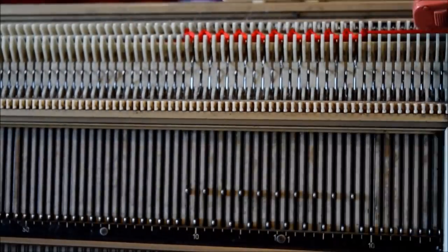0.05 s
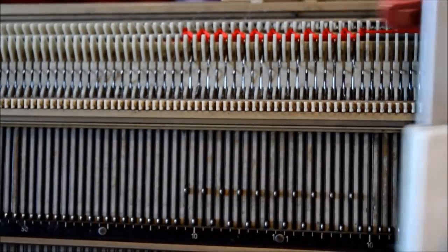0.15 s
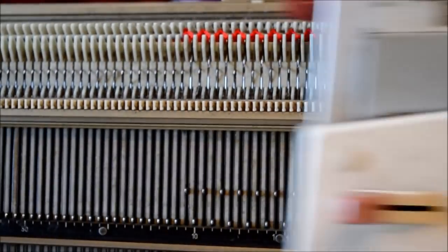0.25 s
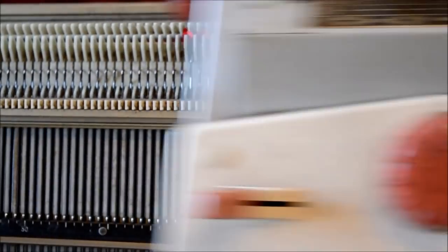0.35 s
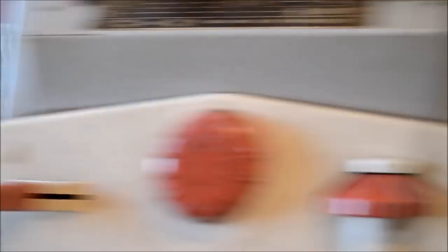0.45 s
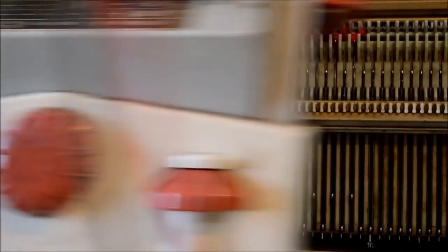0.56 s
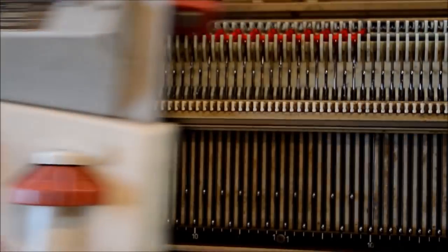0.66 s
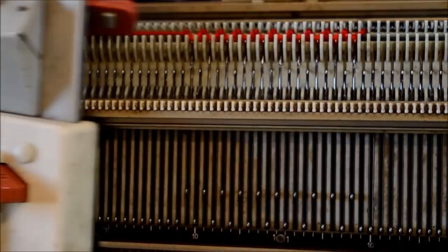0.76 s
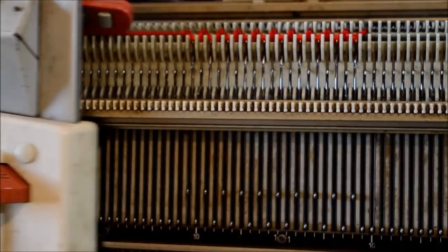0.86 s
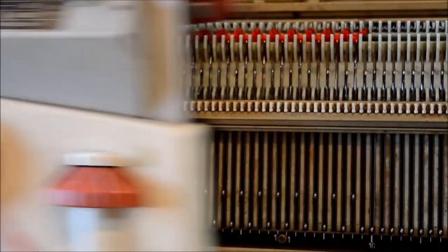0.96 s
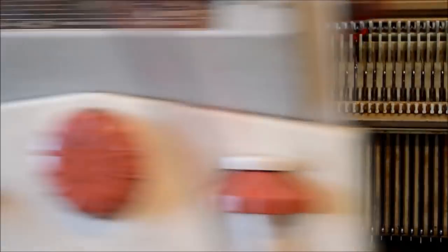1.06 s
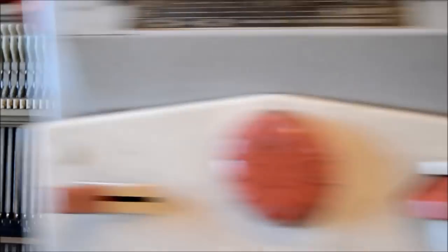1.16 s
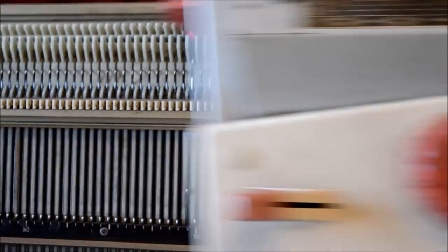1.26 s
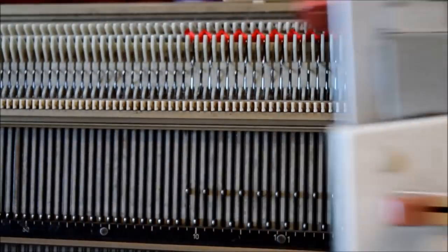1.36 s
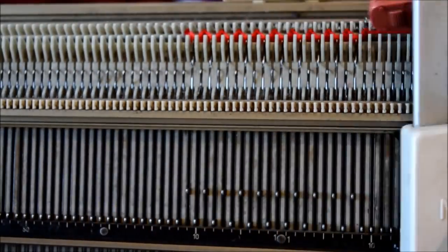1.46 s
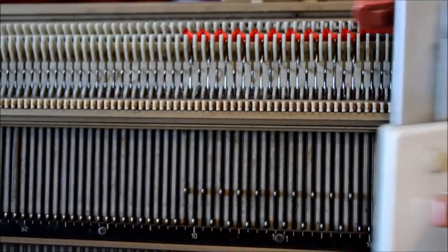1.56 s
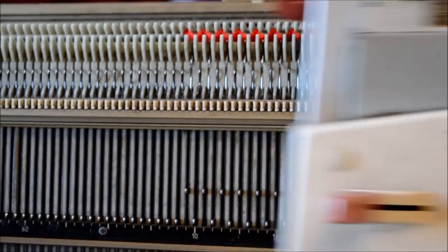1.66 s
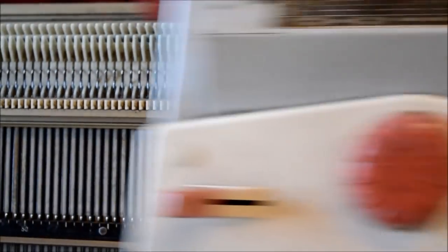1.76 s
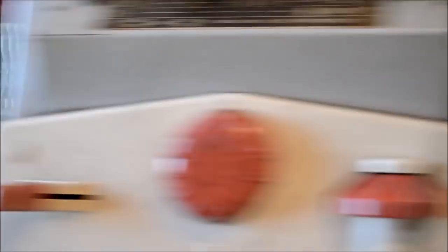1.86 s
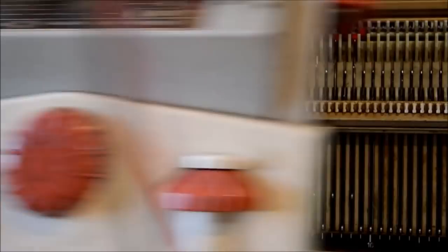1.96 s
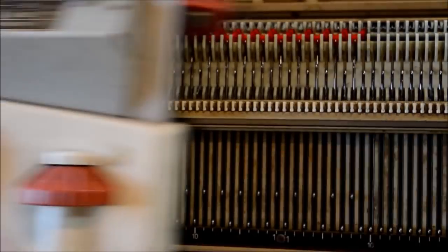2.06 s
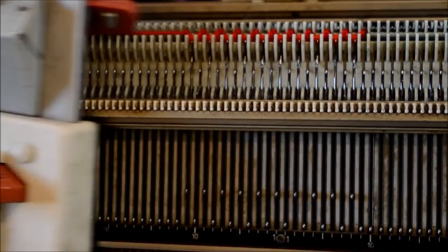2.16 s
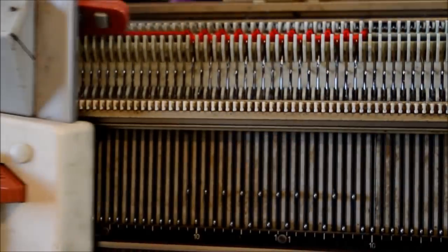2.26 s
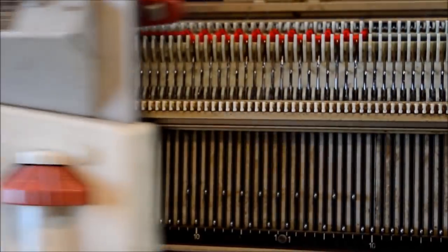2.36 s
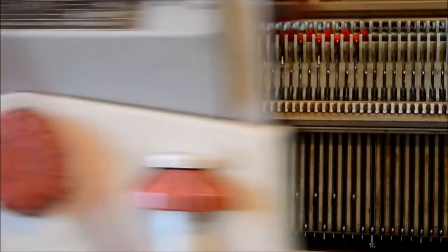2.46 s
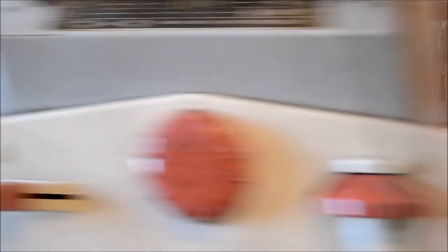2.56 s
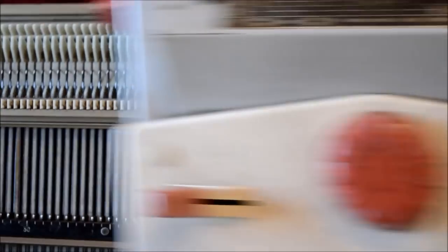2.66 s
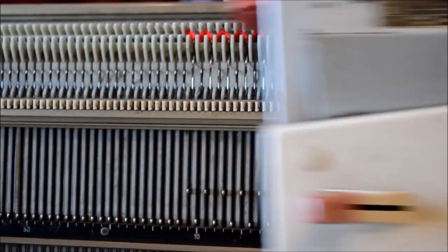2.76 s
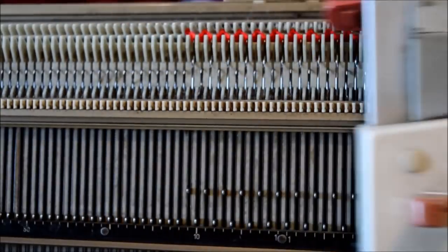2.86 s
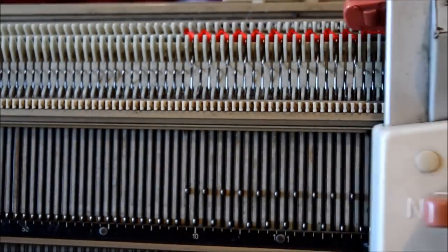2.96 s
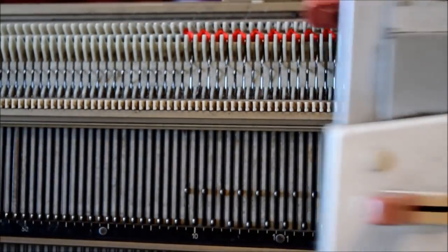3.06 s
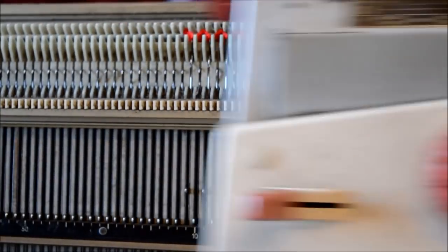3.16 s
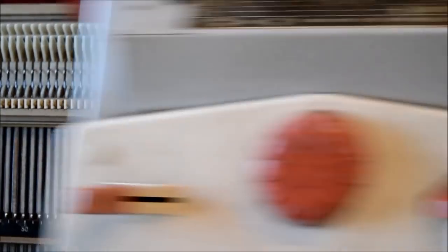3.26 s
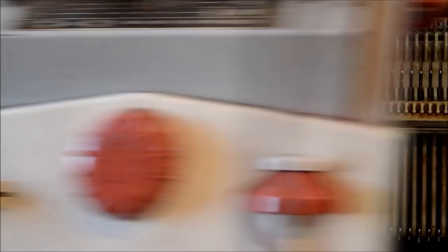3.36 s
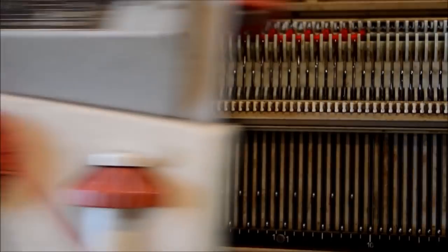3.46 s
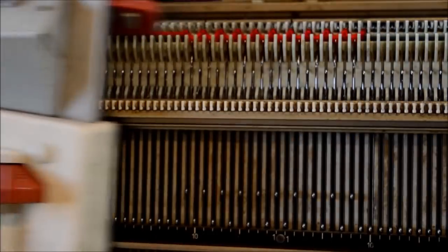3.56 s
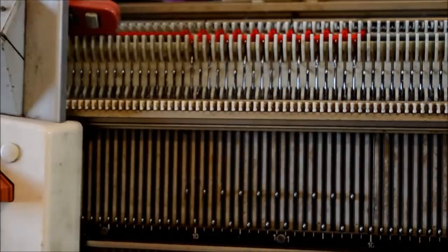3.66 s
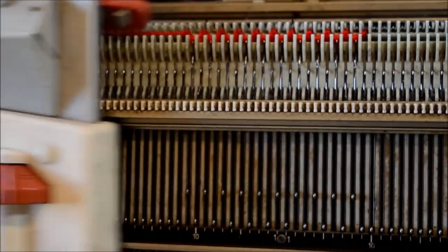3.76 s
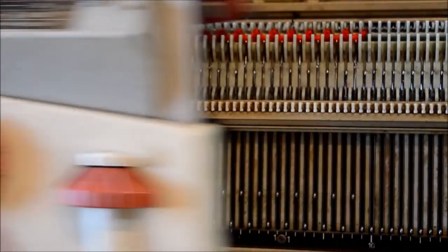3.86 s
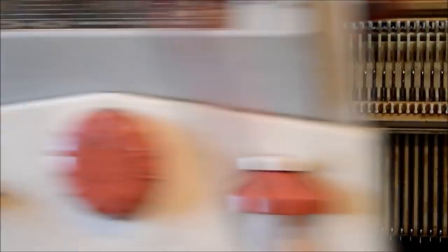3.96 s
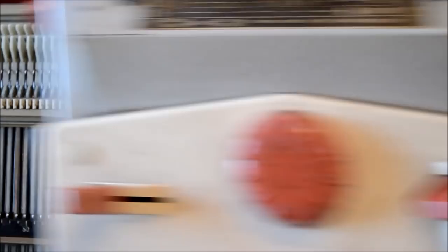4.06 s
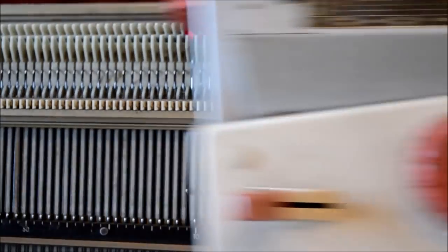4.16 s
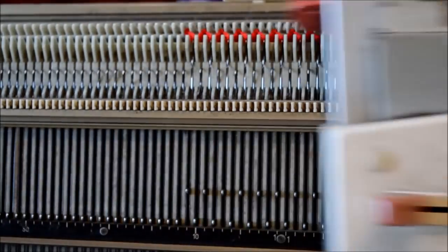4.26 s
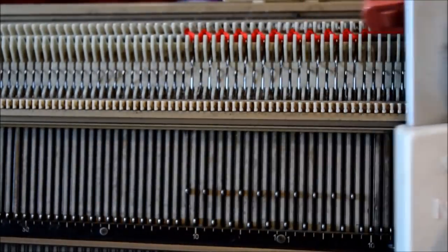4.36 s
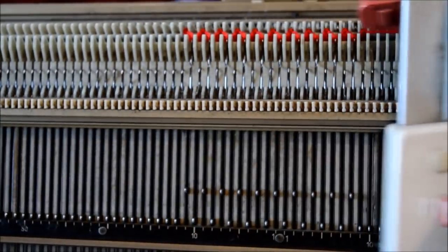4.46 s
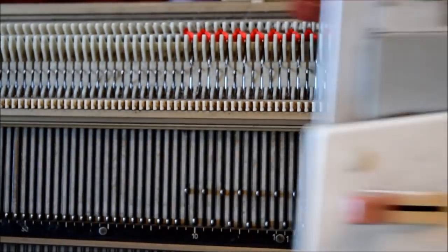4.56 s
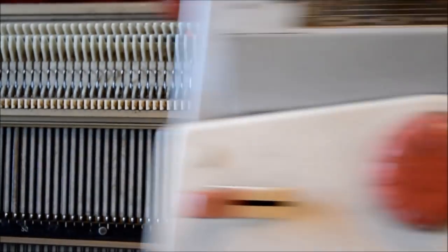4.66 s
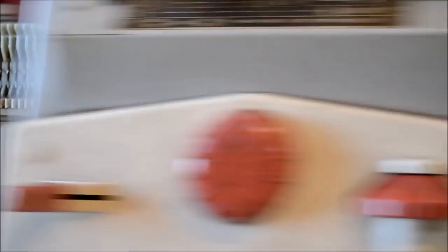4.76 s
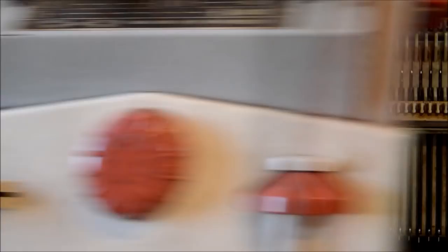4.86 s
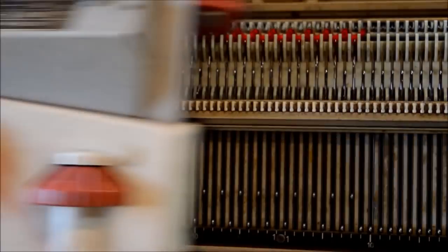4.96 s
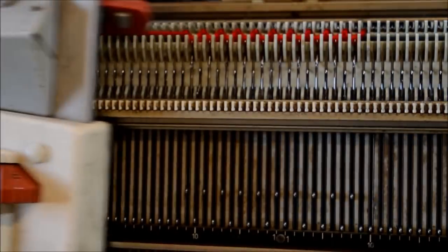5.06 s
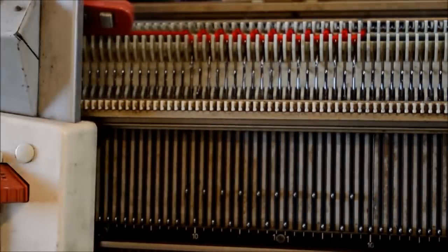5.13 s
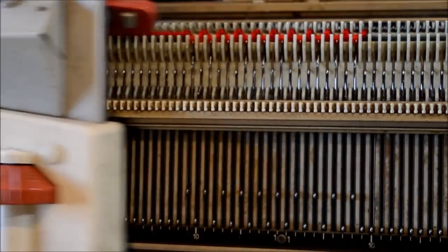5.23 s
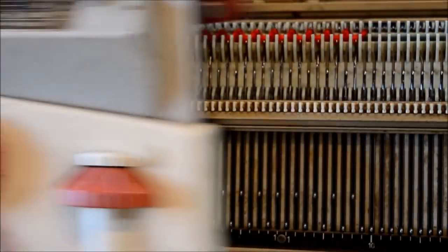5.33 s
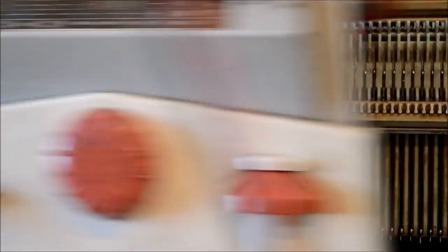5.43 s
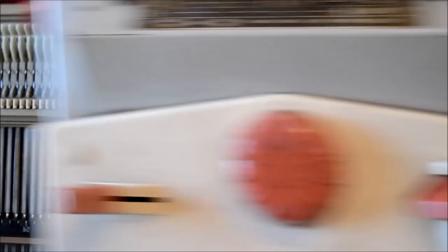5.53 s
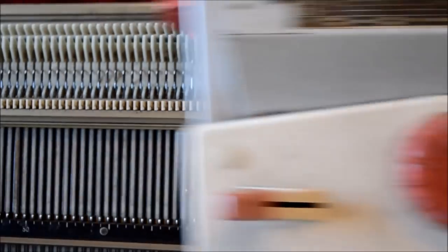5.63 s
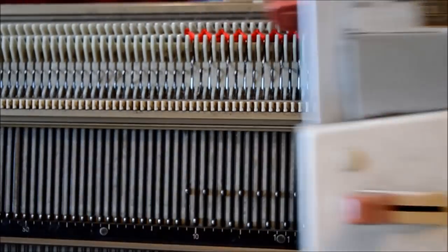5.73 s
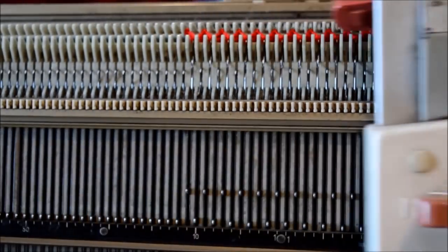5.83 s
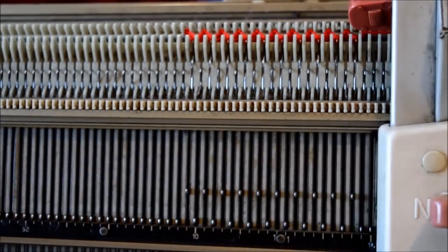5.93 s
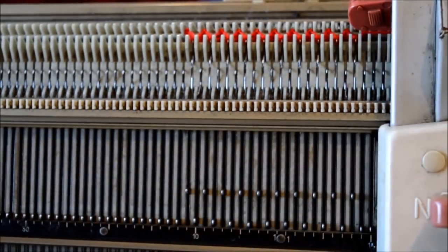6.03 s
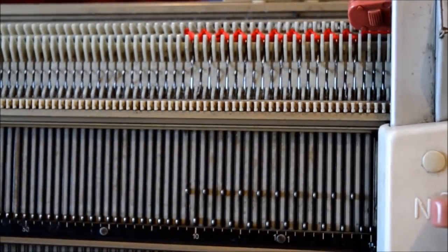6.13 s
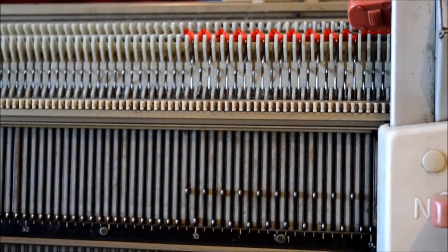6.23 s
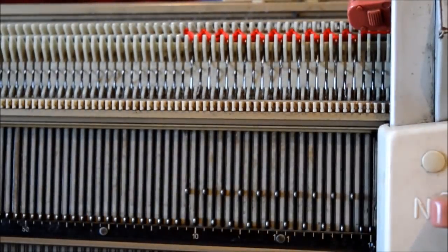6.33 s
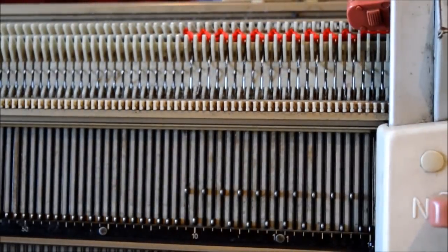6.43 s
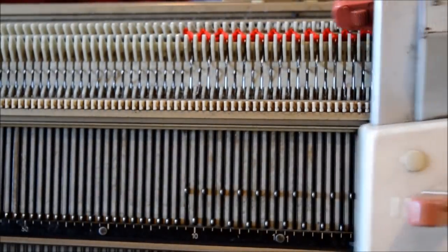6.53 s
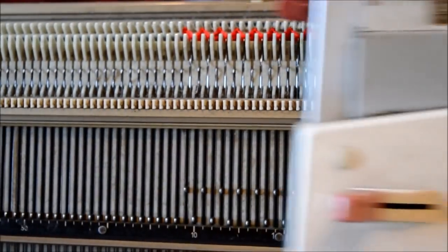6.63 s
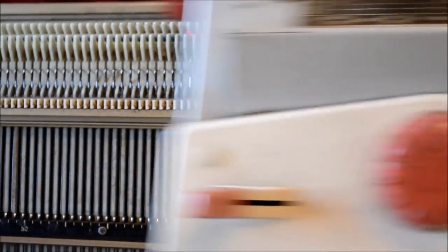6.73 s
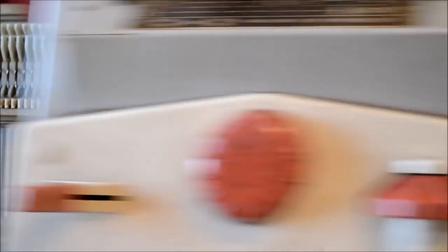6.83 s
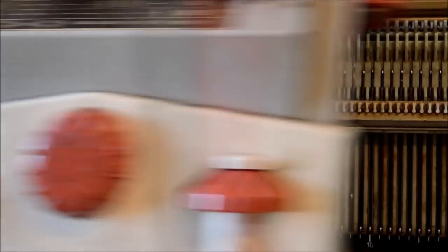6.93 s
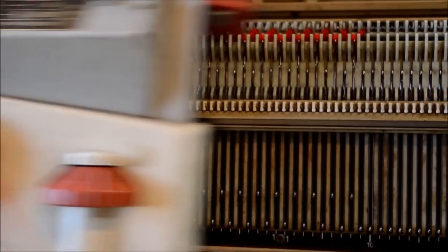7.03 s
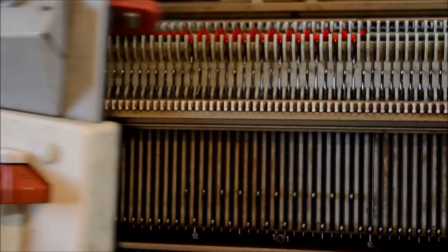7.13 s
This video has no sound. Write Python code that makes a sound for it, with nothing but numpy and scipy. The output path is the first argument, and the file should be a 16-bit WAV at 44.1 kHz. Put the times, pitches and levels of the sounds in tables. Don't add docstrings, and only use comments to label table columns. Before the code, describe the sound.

A knitting machine carriage is shoved back and forth over metal needle beds, sharp steel clacks at each turn followed by rattling, ticking swishes indoors.

```python
import sys
import numpy as np
from scipy import signal
from scipy.fft import rfft, irfft
from scipy.io import wavfile
from scipy.ndimage import uniform_filter1d

SR = 44100
rng = np.random.default_rng(int(sys.argv[2]) if len(sys.argv) > 2 else 0)


def to_wav(s):
    ch = np.atleast_2d(s).T
    pcm = np.round(np.clip(ch, -1, 1) * 32767)
    wavfile.write(sys.argv[1], SR, pcm.astype(np.int16))


def ratio_of_db(decibels):
    return 10 ** (np.asarray(decibels, float) / 20)


N = 317079
LEAD = SR // 2
M = N + LEAD
TIME = (np.arange(M) - LEAD) / SR

# turn_s (main clack), cam_slowness, last_snap_s, strength_db, snap_ring_hz
LEFTWARD = [
    (.2431, 1.08, 0.63, 0, 5080),
    (1.6856, 1.12, 2.068, -0.5, 5100),
    (3.1513, 1.1, 3.51, 0.5, 5270),
    (4.6047, 1, 4.97, 0, 4900),
    (6.6707, 1.1, 7.0348, 1.5, 4700),
]
RIGHTWARD = [
    (-.41, 1., -.09, 0.4, 4200),
    (.9721, 1.02, 1.364, -0.081, 4300),
    (2.409, 1, 2.8203, 0.36, 4060),
    (3.8501, 1.14, 4.2674, -0.19, 4900),
    (5.3228, 1.16, 5.745, 0, 4180),
]


def unit(x):
    return x / np.sqrt(np.mean(x ** 2))


def colour(x, table):
    hz, db = np.transpose(table)
    f = np.fft.rfftfreq(len(x), 1 / SR) + 1
    gain_db = np.interp(np.log(f), np.log(hz), db)
    return irfft(rfft(x) * ratio_of_db(gain_db), len(x))


def band(x, lo_hz, hi_hz):
    sos = signal.butter(3, [lo_hz, min(hi_hz, 0.45 * SR)], "bandpass", fs=SR, output="sos")
    return signal.sosfilt(sos, x)


def ring(x, modes):
    out = 0
    for k, (hz, width_hz, db) in enumerate(modes):
        b, a = signal.iirpeak(hz, hz / width_hz, SR)
        out = out + (-1) ** k * ratio_of_db(db) * signal.lfilter(b, a, x)
    return out


def walk(rate_hz):
    k = int(SR / rate_hz)
    held = np.repeat(rng.standard_normal(M // k + 1), k)
    return 3.5 * uniform_filter1d(held, k)[:M]


def track(rows):
    s, *columns = np.transpose(rows)
    return [np.interp(TIME, s, c) for c in columns]


def chatter(rate_hz, jitter, scatter_db, rise_ms, fall_ms):
    chance = rng.random((int(M / SR * 1500), 2))
    gaps = 1 + jitter * (2 * chance[:, 0] - 1)
    at = (np.cumsum(gaps) * SR / rate_hz).astype(int)
    blows = np.zeros(M)
    blows[at[at < M]] = ratio_of_db(-scatter_db * np.log(chance[at < M, 1] + 1 / 8))
    t_ms = np.arange(SR // 20) / SR * 1000
    shape = (1 - np.exp(-t_ms / rise_ms)) * np.exp(-t_ms / fall_ms)
    return unit(signal.fftconvolve(blows, shape)[:M])


def swell(ms, rise, hold, fall, ring_on=0.36, ring_ms=8.0):
    t = np.arange(SR // 20) / SR * 1000 / ms
    after = np.maximum(t - hold, 0)
    bite = 1 - np.exp(-(t / rise) ** 2)
    return bite * ((1 - ring_on) * np.exp(-after / fall) + ring_on * np.exp(-after * ms / ring_ms))


def burst(shape, noise):
    shaped = shape * noise
    return shaped * np.sqrt(np.sum(shape ** 2) / np.sum(shaped ** 2))


def cam_flips():
    # early_ms, top_db, plate_minus_top_db, shell_minus_top_db, length_ms
    cams_left = [
        (36, -23, -2.5, -8.5, 5),
        (31.4, -18, -1, -13, 7),
        (14.06, -13.5, 1, -11, 4),
        (7.1, -7, -5.5, -15, 4.2),
        (0, 1.1, 0.6, -5.5, 5.3),
    ]
    cams_right = [
        (75, -26, -15, -7, 3.3),
        (62, -20, -4, -3.5, 8),
        (54, -13, -2, -9, 5),
        (47.4, -15, 2, -8.5, 5.4),
        (35.8, -12, 2, -7, 4),
        (26.9, -6, -0.5, -14.5, 3.4),
        (17.3, -7, -1, -14.5, 6),
        (10, -9, 1, -11, 5),
        (0, 0, -1.5, -10, 9),
    ]
    # start_s, top_db, plate_minus_top_db, length_ms
    slack = [(.1756, -21.5, -10, 4.5), (.1865, -32.5, 0, 9), (.8724, -34, -10, 2.7), (1.5959, -30, -5, 6),
             (1.62, -30, -8, 4), (1.6287, -30, -1, 5), (1.674, -14, -4, 4), (2.308, -34, -5, 4.3),
             (3.061, -28, -4.5, 6.6), (3.081, -32, -8, 5), (3.093, -36, -14, 4), (4.5219, -35.5, -1, 7.8),
             (4.5426, -23, -13.5, 4.8), (4.5517, -23.5, -5.5, 8.4), (5.2845, -16, 3, 2.2),
             (6.5874, -28, -9, 5), (6.602, -32, -4, 3.5), (6.6451, -21.5, -5.5, 9)]
    flips = []
    for passes, cams in [(LEFTWARD, cams_left), (RIGHTWARD, cams_right)]:
        for turn_s, slowness, *_ in passes:
            for early_ms, *levels in cams:
                flips.append((turn_s - slowness * early_ms / 1000, *levels))
    for start_s, top_db, plate_db, ms in slack:
        flips.append((start_s, top_db, plate_db, -8, ms))
    return flips


def snaps():
    # start_s, top_db, ring_hz, ring_minus_top_db
    loose_parts = [(0.345, -13.5, 10800, -5), (0.3805, -12, 7680, 7.5), (0.43, -13, 9520, -9),
                   (1.057, -17, 9540, 1), (1.0912, -15, 9800, -8), (1.123, -13, 11600, 4),
                   (1.8003, -15, 7730, 7.5), (1.851, -12, 9500, -7), (2.4996, -12, 9660, 7),
                   (2.5342, -12, 8760, -8.5), (2.5577, -12, 11800, 5), (2.5672, -18.5, 7900, -7),
                   (3.25, -13, 7860, 7), (3.304, -8, 4830, 6), (3.678, -36, 13000, 3),
                   (3.934, -22, 10000, -7), (3.947, -11, 11100, 3), (3.9593, -15, 11000, 5.5),
                   (3.982, -12.5, 11760, 2), (4.0042, -13, 11600, 10), (4.7139, -13.5, 7820, 7),
                   (4.7642, -15, 7880, -5.5), (4.848, -13, 10340, -2), (4.9056, -19, 9400, -5),
                   (5.4094, -17.5, 9500, 2), (5.4212, -15, 10940, 5), (5.444, -16, 11840, 11),
                   (5.477, -12, 7800, -3.5), (6.7765, -13, 7840, 8.5)]
    # start_s, top_db, ring_hz, ring_minus_top_db, length_ms
    first_stirs = [
        (.158, -34.5, 6500, -1, 4),
        (6.4546, -50, 1920, 28, 5),
        (6.4546, -50, 5000, 14, 3),
        (6.466, -58, 680, 28, 8),
        (6.557, -42, 6500, 2, 8),
    ]
    # late_ms, top_db, ring_hz (0: the pass's own), ring_minus_top_db, length_ms
    snaps_left = [
        (-36, -17, 9300, 0, 4.4),
        (0, -13, 0, 3, 5),
        (8, -19, 10000, -2, 2.8),
    ]
    snaps_right = [
        (0, -14, 0, 7, 2.4),
        (0, -16, 8500, 4, 2.2),
        (8, -22, 6000, 0, 2.5),
    ]
    rows = [(*part, 3.7) for part in loose_parts] + list(first_stirs)
    for passes, parts in [(LEFTWARD, snaps_left), (RIGHTWARD, snaps_right)]:
        for _, _, snap_s, _, own_hz in passes:
            for late_ms, top_db, hz, ring_db, ms in parts:
                rows.append((snap_s + late_ms / 1000, top_db, hz or own_hz, ring_db, ms))
    return rows


def clacks():
    # mode_hz, width_hz, level_db
    steel_modes = [(5700, 670, -5), (4440, 800, -8), (3360, 3000, -15.5), (7980, 770, -7),
                   (8900, 590, -4.5), (10400, 750, -2.5), (11700, 1460, -10.5), (14600, 3300, -30)]
    shell_modes = [(1080, 380, 6), (1416, 480, 6.5), (1980, 1100, -3.5), (732, 230, 3)]
    bounces = 0.8 + chatter(900.0, jitter=0.9, scatter_db=3.0, rise_ms=0.1, fall_ms=0.5)
    steel = ring(bounces * rng.standard_normal(M), steel_modes)
    top, plate = band(steel, 7400, 20700), band(steel, 2500, 6630)
    shell = ring(rng.standard_normal(M), shell_modes)
    out = np.zeros(M)
    for s, top_db, plate_db, shell_db, ms in cam_flips():
        first = LEAD + int(s * SR) - 20
        n = slice(first, first + SR // 20)
        shape = swell(ms, rise=0.22, hold=0.7, fall=0.5)
        crunch = burst(shape, top[n]) + ratio_of_db(plate_db) * burst(shape, plate[n])
        answer = burst(swell(ms, rise=0.28, hold=0.63, fall=6.2 / ms), shell[n])
        out[n] += ratio_of_db(top_db - 4.5) * (crunch + ratio_of_db(shell_db - 1.5) * answer)
    for s, top_db, hz, ring_db, ms in snaps():
        first = LEAD + int(s * SR)
        n = slice(first, first + SR // 20)
        shape = swell(ms, rise=0.1, hold=0.3, fall=0.4, ring_on=0.15)
        phase = 2 * np.pi * hz * (TIME[n] - s)
        own = shape * (np.sin(phase) + 0.6 * np.sin(0.88 * phase))
        crack = burst(shape, top[n]) + ratio_of_db(-7.0) * burst(shape, plate[n])
        crack = crack + ratio_of_db(-9.0) * burst(shape, shell[n])
        level_db = min(top_db, -12.5) - 0.8
        out[n] += ratio_of_db(level_db) * (crack + ratio_of_db(ring_db - 0.5) * own)
    return out


def strokes():
    # share_of_crossing, ticks_db, shell_load_db, bed_weight_db
    cross_left = [
        (0, -19.5, -5, -11),
        (.22, -17, -2.5, -9.5),
        (.45, -13, -3, -8.5),
        (.72, -18.5, 2.5, -2.5),
        (1, -20.5, 0.9, -4),
    ]
    cross_right = [
        (0, -28.5, -7.5, -9),
        (.22, -15, -6, -17),
        (.45, -14, -.7, -10),
        (.72, -20, 1.9, -1.5),
        (1, -21.5, -.6, -1.5),
    ]
    # offset_s from start or end of crossing, ticks_db, shell_load_db, bed_weight_db
    rest_left = (-0.067, -42.5, 7.5, 9)
    coast_left = (0.063, -30, 1.4, -.6)
    rest_right = (-0.12, -43.5, 9.6, 11)
    coast_right = (0.076, -31.5, 3.8, 2.1)
    # time_s, ticks_db, shell_load_db, bed_weight_db
    pause = [
        (6.0, -47, 11.5, 13),
        (6.2, -66, 10, 20),
        (6.44, -76, 16, 22),
        (6.47, -58, 20, 28),
        (6.55, -62, 15, 12),
        (7.19, -39, 9, 9),
    ]
    rows = list(pause)
    for passes, cross, rest, coast, enter_s in [(LEFTWARD, cross_left, rest_left, coast_left, 0.017),
                                                (RIGHTWARD, cross_right, rest_right, coast_right, 0.034)]:
        for turn_s, _, snap_s, strength_db, _ in passes:
            start, end = turn_s + enter_s, snap_s - 0.028
            rows.append((start + rest[0], *rest[1:]))
            rows.append((end + coast[0], coast[1] + strength_db, *coast[2:]))
            for share, ticks_db, *loads in cross:
                rows.append((start + share * (end - start), ticks_db + strength_db, *loads))
    ticks_db, load_db, weight_db = track(sorted(rows))
    plate_db = 0.35 * load_db + 0.21 * (-15 - ticks_db)
    return ticks_db, plate_db, load_db, weight_db


def rattle():
    # freq_hz, density_db_per_hz
    rattle_spectrum = [(120, -58), (200, -30), (462, -5.5), (515, -8), (677, 0.5), (798, -1), (1380, -12.5),
                       (1950, -15), (3070, -20.5), (6590, -21), (9830, -13.5), (11600, -20), (15500, -38.5)]
    # mode_hz, width_hz, level_db
    shell_early = [(1390, 750, 2), (2470, 250, -6)]
    shell_late = [(1970, 880, 5.9), (1310, 740, 3.3)]
    ticks_db, plate_db, shell_db, bed_db = strokes()
    hiss = colour(rng.standard_normal(M), rattle_spectrum)
    busy = np.clip((ticks_db + 42.0) / 12, 0, 1)
    late = np.clip((bed_db + 9.5) / 9, 0, 1)
    needles = busy * chatter(140.0, jitter=0.6, scatter_db=3.5, rise_ms=0.5, fall_ms=1.4)
    latches = busy * chatter(230.0, jitter=0.8, scatter_db=3.5, rise_ms=0.5, fall_ms=1.3)
    knocks = busy * chatter(120.0, jitter=0.7, scatter_db=-3.5, rise_ms=0.51, fall_ms=3.5)
    wide = unit(band(hiss, 1118, 2733))
    other = band(rng.standard_normal(M), 1160, 2450)
    early_ring, late_ring = unit(ring(other, shell_early)), unit(ring(other, shell_late))
    shell = 0.84 * wide + np.sqrt(1 - late) * early_ring + np.sqrt(late) * late_ring

    tick_layer = (1.5 + needles) * unit(band(hiss, 6800, 19000))
    plate_layer = (1.9 + 0.6 * needles + 0.8 * latches) * unit(band(hiss, 2450, 6800))
    shell_layer = (3.3 + 0.83 * latches + knocks) * shell
    bed_layer = (2.04 + knocks) * unit(band(hiss, 250, 974))
    out = np.zeros(M)
    for over_ticks_db, layer in [(0, tick_layer), (plate_db, plate_layer),
                                 (shell_db, shell_layer), (bed_db, bed_layer)]:
        out += ratio_of_db(ticks_db + over_ticks_db - 3.0) * unit(layer)
    return out


def thumps(push_ms=1.1):
    # start_s, level_db
    jolts = [
        (0.243, -41),
        (0.976, -21),
        (1.69, -15),
        (2.409, -41),
        (3.149, -44.5),
        (3.853, -24),
        (4.607, -15),
        (5.325, -25),
        (6.455, -31),
        (6.671, -25),
    ]
    # mode_hz, t60_s, level_db
    lever = [(1290, .4, -26), (2420, .7, -23)]
    # mode_hz, t60_s, level_db
    rail = (1250, .8, -29)
    out, t = np.zeros(M), np.arange(SR // 4) / SR
    x = t * 1000 / push_ms
    push = x * (2 - x) * np.exp(-x)
    for s, db in jolts:
        out[LEAD + int(s * SR):][:len(t)] += ratio_of_db(db + 3.5) * push
    rings = [(1.688, *mode) for mode in lever]
    rings += [(turn_s, *rail) for turn_s, *_ in RIGHTWARD]
    for s, hz, t60_s, db in rings:
        tone = np.sin(2 * np.pi * hz * t) * np.exp(-np.log(1000) * t / t60_s)
        out[LEAD + int(s * SR):][:len(t)] += ratio_of_db(db) * tone
    return out


def room(x, gap_ms=1.1, build_ms=3.0, move_s=0.09):
    # centre_hz, t60_s, level_db
    decay_bands = [(264, 1.0, -7), (675, 0.78, -6.5), (1740, 1, -3.5), (3350, 1, -5.5), (6500, 0.44, -11),
                   (10400, 0.39, -8), (14000, .4, -24)]
    t = np.arange(int(1.2 * SR)) / SR
    hz = np.array(decay_bands)[:, 0]
    edges_hz = [80, *np.sqrt(hz[1:] * hz[:-1]), 19000]
    build = 1 - np.exp(-np.maximum(t * 1000 - gap_ms, 0) / build_ms)
    noise, tail = rng.standard_normal((4, len(t))), 0
    for k, (_, t60_s, db) in enumerate(decay_bands):
        fade = np.exp(-np.log(1000) * t / t60_s) * build
        echoes = band(noise, edges_hz[k], edges_hz[k + 1])
        tail = tail + ratio_of_db(db) * echoes * fade / np.sqrt(np.sum(fade ** 2))
    apart = (TIME / move_s - np.arange(4)[:, None]) % 4 - 2
    share = np.cos(np.pi / 2 * np.clip(apart, -1, 1))
    return signal.fftconvolve(x * share, tail, axes=1)[:, :M].sum(axis=0)


def house():
    # time_s, rumble_db, drone_db
    levels = [
        (0.0, -59.5, -51.5),
        (1.8, -51.5, -51),
        (1.98, -58, -52),
        (4.44, -55.5, -50.5),
        (7.19, -54.5, -55),
    ]
    # freq_hz, density_db_per_hz
    hum_spectrum = [(47, -47), (80, -26.5), (116, 4.5), (152, -18.5), (181, -5), (246, -18), (275, 2.5),
                    (366, -7), (693, -7), (2900, -34), (15500, -30)]
    rumble_db, drone_db = track(levels)
    rumble = unit(ring(rng.standard_normal(M), [(49.3, 26, 0)])) * ratio_of_db(rumble_db + 0.84 * walk(10.0))
    drone_modes = [(188, 78, 2), (145, 34, 3.0), (100, 13, -5.0)]
    drone = unit(ring(rng.standard_normal(M), drone_modes)) * ratio_of_db(drone_db)
    hiss = unit(colour(rng.standard_normal(M), hum_spectrum)) * ratio_of_db(-51)
    return hiss + band(rumble + drone, 35, 400)


def scene():
    carriage = rattle() + clacks()
    return (carriage + room(carriage) + thumps() + house())[None, LEAD:]


def roll_off(x):
    return signal.sosfilt(signal.butter(12, 15650, fs=SR, output="sos"), x)


def record(dry):
    clipped = np.clip(dry, -1, 1)
    return roll_off(clipped)


dry = scene()
out = record(dry)
to_wav(out)
```